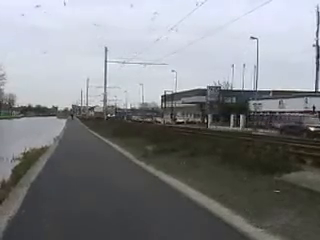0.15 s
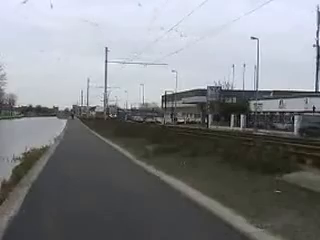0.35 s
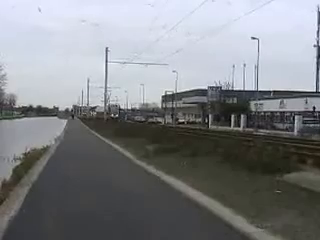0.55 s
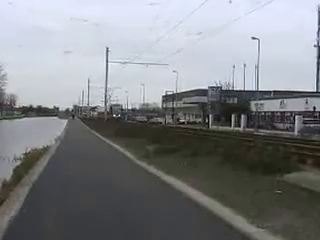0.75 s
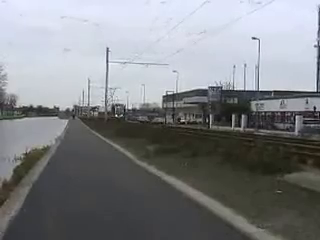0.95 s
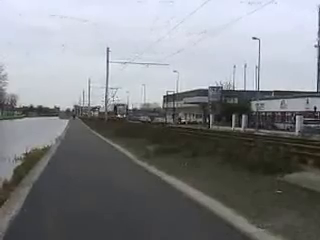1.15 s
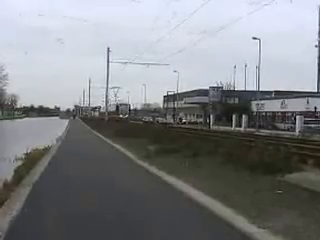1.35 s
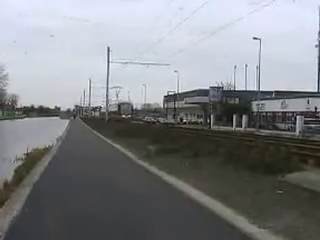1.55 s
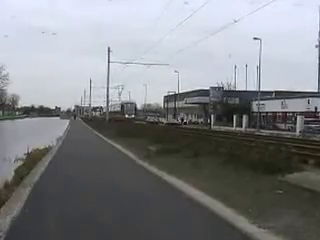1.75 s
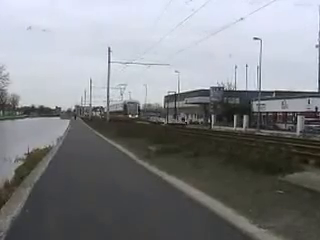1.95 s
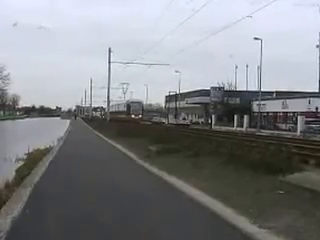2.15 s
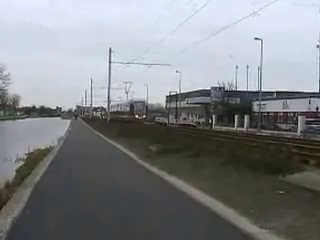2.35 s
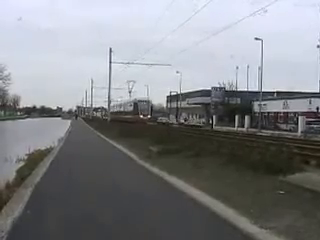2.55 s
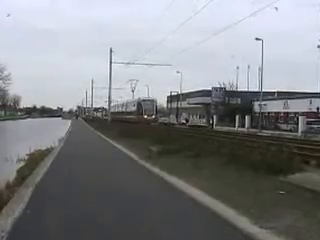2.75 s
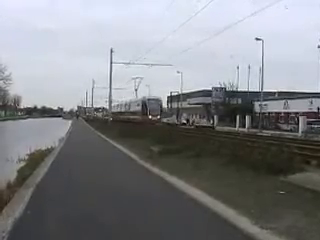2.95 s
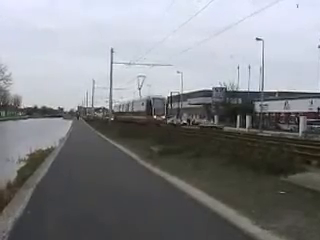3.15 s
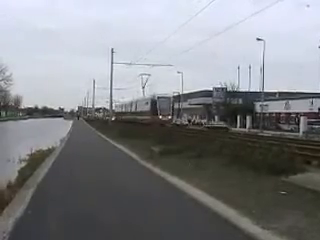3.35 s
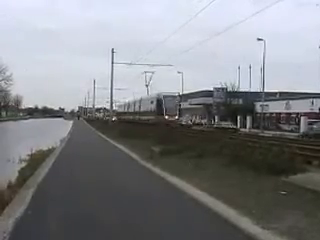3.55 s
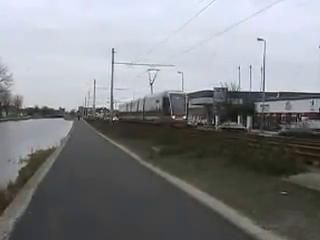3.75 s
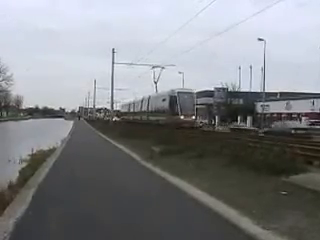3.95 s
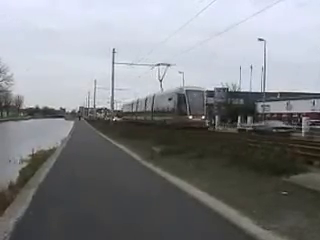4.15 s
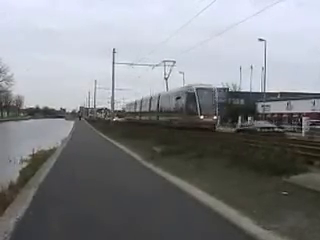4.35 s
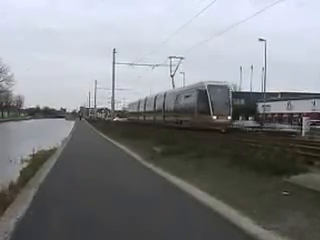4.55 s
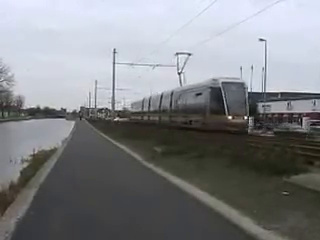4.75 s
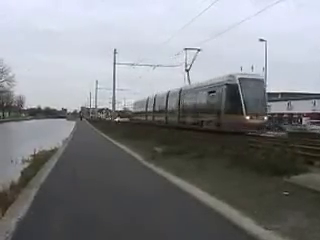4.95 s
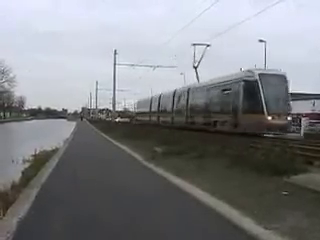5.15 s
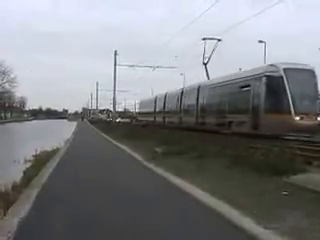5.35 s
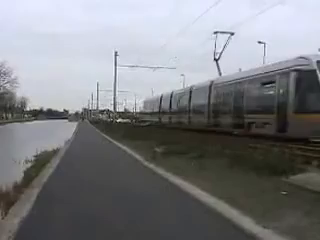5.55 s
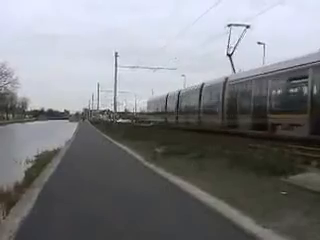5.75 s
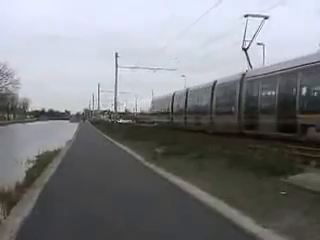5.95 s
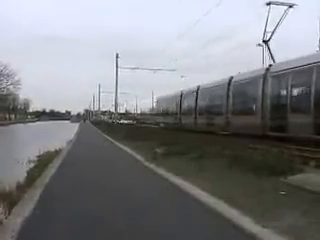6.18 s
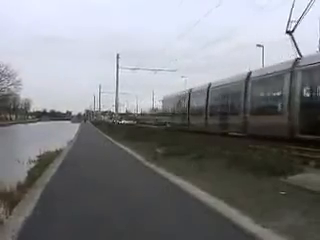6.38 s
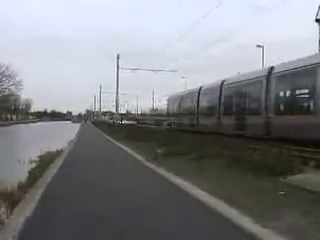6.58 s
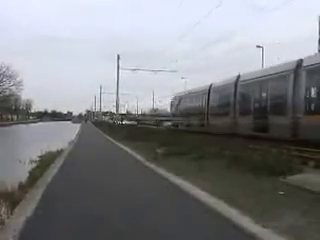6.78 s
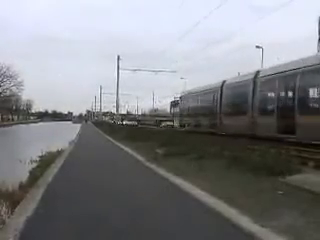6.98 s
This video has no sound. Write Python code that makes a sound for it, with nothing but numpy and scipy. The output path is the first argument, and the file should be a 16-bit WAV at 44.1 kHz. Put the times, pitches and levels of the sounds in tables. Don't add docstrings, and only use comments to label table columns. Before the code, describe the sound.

An open canal path beside a tram track, heard through a small camera microphone with faint hiss and slightly rough, muffled treble. In the first second, low wind gusts buffet it, strongest around 0.6 s, over a distant, dull rolling rumble. A soft joint knock comes at 1.3 s and motor hum swells briefly near 1.6 s. More gusts flutter at 2.3-2.7 s, with a faint knock at 2.9 s. The rumble gains weight, and a low electric hum rises around 4-4.5 s. The nose draws level at about 4.6 s, slightly right; wheel hiss and metallic rail ringing jump forward, with a knock at 4.9 s. The hum sags in pitch, swelling again at 5.5 s. Thuds follow at 5.75 s, a strong double knock at 6.3 s, then higher and duller ones at 6.4 and 6.6 s. The rolling remains full and close until the end at 7 s.

```python
import sys
import numpy as np
from scipy import signal
from scipy.fft import rfft, irfft, dct, next_fast_len
from scipy.io import wavfile
from scipy.ndimage import uniform_filter1d

SR = 44100
rng = np.random.default_rng(int(sys.argv[2]) if len(sys.argv) > 2 else 0)


def wav_record(signal):
    frames = np.transpose(np.atleast_2d(signal))
    bounded = np.clip(frames, -1, 1)
    quanta = np.round(bounded * 32767).astype(np.int16)
    wavfile.write(sys.argv[1], SR, quanta)


def level_to_linear(level):
    exponent = np.asarray(level, float) / 20
    return 10 ** exponent


N = 309582
T = np.arange(N) / SR

ROLL_AT_HZ = [250, 400, 1100, 4500]
# (frequency [Hz], density [dB per Hz])
ROLL_COLOUR = [(18, -43), (30, -27.5), (59, -9.5), (92, -13.0), (128, -7.5), (224, -9.0), (441, -2),
               (869, -18.5), (999, -14.5), (1320, -16), (2550, -25.5), (3450, -30.0), (6790, -36.5),
               (8000, -44.0), (10400, -73), (17600, -120)][:-2] + [(8900, -50.0), (9300, -63.5)]
# (frequency [Hz], width [Hz], level [dB])
RAIL_BOUNCE = [(449.2, 70, 2), (375, 37, -20.5), (497.6, 60, -1.5)]
# (frequency [Hz], width [Hz], level [dB])
WHEEL_RING = [(722.6, 130, 5), (2330, 480, 3), (3477, 400, -7.5), (7540, 1300, -12.5)]
# (multiple of the pitch [1], level [dB])
MOTOR_ORDERS = [(.667, -12.5), (1, 2), (2, -5.5), (4, -13)]
# (time [s], level [dB], half length [s])
HUM = [(.33, -37.5, .1), (1.25, -35, 0.13), (1.57, -27.5, 0.078), (2.15, -36, .3), (3.2, -33.5, .5),
       (3.95, -25, .13), (4.45, -24, .25), (4.85, -31, 0.22), (5.53, -24, 0.14), (6.0, -27, .22),
       (6.7, -41, .3)]
# (time [s], pitch rise [Hz], half length [s])
TRAILING_MOTOR = (6.05, 4, .25)
# (time [s], peak [dB], frequency [Hz])
KNOCKS = [
    (1.297, -8.5, 468),
    (2.864, -12, 426),
    (4.895, -4, 454),
    (5.75, -3.5, 458),
    (6.589, -5, 393),
    (6.294, 0, 443),
    (6.309, 1.5, 415),
    (6.418, -2.5, 520),
]
# (time [s], level [dB])
NEARNESS = [(0.0, -42.5), (0.02, -48), (0.53, -48.5), (1.68, -42), (2.31, -44), (3.21, -42.5), (4.85, -32),
            (4.96, -34), (5.14, -31.5), (5.2, -35), (6.96, -34), (7.02, -31.5)]
# (level [dB], share of nearness [1], closing [dB per s], added once abreast [dB per s])
BODY = (-26, 0.38, 1.046, -3)
TRACK_BED = (-25.5, 0.03, 1.9, -0.77)
RAIL = (-23.5, 0.4626, 0.34, -1.07)
CONTACT = (-36.5, 1.22, 0.1969, -1.2)
BOUNCE = (-18, 0.28, 0.16, -0.9)
RING = (-33.5, 0.4, -0.21, 1.5)
SPREAD_MID = (-45, 0.29, 1.73, -1.2)
SPREAD_HIGH = (-50, 1.5, -0.1, -3)
# (time [s], half length [s],
# body [dB], track bed [dB], rail bounce [dB])
SURGES = [(1.302, .4, -2, -.5, .1), (2.856, .25, 0, 1.5, .1), (3.565, 0.031, -4.5, -4.5, .1),
          (4.258, 0.34, 2, 1.5, .1), (5.1, .15, -0.5, -2, 1), (5.75, 0.2, 0.4, -3.5, 4),
          (6.201, .1, 0, 2.5, -2), (6.32, .04, -1.5, -6.5, -7), (6.406, .012, -3.5, -6, -5.5),
          (6.597, .15, -0.2, 1, 0.3), (6.897, .12, 0, -3, 2), (7.03, .025, -8, -12, -12)]
# (frequency [Hz], density [dB per Hz])
SPREAD_COLOUR = [(120, -39), (200, -7.5), (450, 4), (624, -4.5), (1390, -8), (1640, -15), (2780, -16.5),
                 (3540, -22.5), (6000, -28), (7800, -68.5), (13200, -120)]
SPREAD_TOP = [(3240, -39.0), (5500, -20.0), (6150, -16.0), (6790, -8.5), (7370, -13), (8040, -3.0),
              (8580, -6.0), (11200, -41.5), (18900, -120)][:-2] + [(9150, -12)]
# (time [s], depth [dB], half length [s])
AXIS_MID = (5.22, -7.5, .46)
AXIS_HIGH = (5.72, -22, .5)
# (time of peak [s], level [dB], rise [s])
GUSTS = [(.05, -25.5, .08), (.18, -31, 0.098), (.46, -22, .08), (.6, -16, 0.11), (1.28, -34, 0.072),
         (1.82, -31, 0.1), (2.34, -24, 0.12), (2.55, -22.5, 0.14), (2.68, -22.5, 0.077), (3.02, -28, 0.11),
         (4.58, -26.5, .12), (4.7, -32, .07), (5.2, -29, 0.11), (5.6, -33, 0.1), (6.02, -36, 0.092)]
# (frequency [Hz], density [dB per Hz])
WIND_COLOUR = [(20, -14), (50, 6), (100, -5.5), (170, -3.5), (300, -33.5), (800, -53.5)]
# (time [s], level [dB], half length [s])
FUZZ = [
    (4.35, -79, .04),
    (4.49, -66, .04),
    (4.66, -77, .05),
    (4.82, -75, .06),
    (5.7, -63, .62),
    (6.55, -74, .1),
    (6.85, -79, .05),
]
# (frequency [Hz], level [dB])
STEP = [(40, -5), (200, -3), (440, 2), (1000, -6), (2000, -10), (3500, -16.5), (5500, -19.5), (7500, -24.5),
        (8500, -22), (10400, -25)]

MID_NEAR_DB, ABREAST_S = -40, 4.6
MOTOR_HZ, SAG_HZ, SAG_MID_S, SAG_S = 71.23, 5.5, 5.1, 1.3
GUST_FALL_SHARE, BREEZE_DB = .6, -45
EDDY_GAP_S, EDDY_DB, EDDY_HZ, EDDY_OCTAVES = 0.03, 7, 105.4, 0.23
MIC_HISS_DB, OFFSET = -64.5, .0067
FRAME, FRAME_START, CUTOFF_HZ = 2822, 1367, 10400


def rolling(flicker_db):
    body_db = level(BODY) + surge(column=2)
    bed_db = level(TRACK_BED) + surge(column=3)
    out = 0
    for k, level_db in enumerate([body_db, bed_db, level(RAIL), level(CONTACT)]):
        share = list(zip(ROLL_AT_HZ, np.arange(len(ROLL_AT_HZ)) == k))
        part = coloured(lambda hz: closed(ROLL_COLOUR)(hz) * np.sqrt(at_hz(share, hz)))
        out = out + level_to_linear(level_db + flicker_db * drift(11)) * part
    return out


def ringing(modes, level_db, from_s, rise_s):
    out = 0
    for hz, width_hz, db in modes:
        rough = rng.standard_normal(N)
        tone = resonate(resonate(rough, hz, width_hz), hz, width_hz)
        out = out + level_to_linear(db) * rms_one(tone)
    arrival = np.clip((T - from_s) / rise_s, 0, 1)
    return level_to_linear(level_db) * arrival * out


def motor():
    sag_hz = SAG_HZ * (1 + np.tanh((T - SAG_MID_S) / SAG_S)) / 2
    hz = MOTOR_HZ - sag_hz + bell(*TRAILING_MOTOR)
    phase = 2 * np.pi * np.cumsum(hz + .4 * drift(2.8)) / SR
    hum = 0
    for order, db in MOTOR_ORDERS:
        waver_db = 2.7 * (order != 1) * drift(1)
        hum = hum + level_to_linear(db + waver_db) * np.sin(order * phase + .3 * order * drift(3.3))
    return np.sqrt(2) * level_to_linear(swells(HUM)) * hum


def knocks(rise_s, fall_s):
    out = np.zeros(N)
    t = np.arange(int(.05 * SR)) / SR
    shape = (1 - np.exp(-t / rise_s)) ** 2 * np.exp(-t / fall_s)
    for s, db, hz in KNOCKS:
        at = round(s * SR)
        out[at:at + len(t)] += level_to_linear(db - 2.5) * shape / shape.max() * np.sin(2 * np.pi * hz * t)
    return out


def spread(tram, lag_db, lean_db):
    middle_db = level(SPREAD_MID) + bell(*AXIS_MID)
    top_db = level(SPREAD_HIGH) + bell(*AXIS_HIGH)
    even = tram / np.sqrt(uniform_filter1d(tram ** 2, size=SR // 2))
    lag = rms_one(np.gradient(uniform_filter1d(even, size=5)))
    same = level_to_linear(lag_db) * lag + level_to_linear(lean_db) * even
    middle = level_to_linear(middle_db + 6.5) * (coloured(closed(SPREAD_COLOUR)) + same)
    return middle + level_to_linear(top_db) * coloured(closed(SPREAD_TOP))


def wind(lump_db, shared_db):
    gust_db = swells(GUSTS, GUST_FALL_SHARE)
    blow = np.hypot(level_to_linear(gust_db - 11.5), level_to_linear(BREEZE_DB + 5.0 * drift(2.1)))
    apart, shared = [blow * coloured(closed(WIND_COLOUR)) * rms_one(level_to_linear(lump_db * drift(20))) for _ in range(2)]
    t = np.arange(-.02, .02, 1 / SR)
    chance = rng.standard_normal((400, 4))
    times = .02 + np.cumsum(EDDY_GAP_S * np.exp(.25 * chance[:, 0]))
    for s, (_, size, pitch, turn) in zip(times[times < N / SR - .03], chance):
        at = round((s - .02) * SR)
        hz = EDDY_HZ * 2 ** (EDDY_OCTAVES * pitch)
        peak = level_to_linear(gust_db[round(s * SR)] + EDDY_DB + 1.5 * size)
        puff = np.cos(2 * np.pi * hz * t + 5 * turn) * np.exp(-(1.3 * hz * t) ** 2)
        apart[at:at + len(t)] += peak * puff
    return apart * [[1], [-1]] + level_to_linear(shared_db) * shared


def microphone_hiss():
    return level_to_linear(MIC_HISS_DB) * coloured(closed([(7000, 0), (11000, 0)]))


def converter_noise():
    treble_db = level(CONTACT)
    activity_db = np.maximum(swells(FUZZ), -83)
    low = 0
    for hz in (8700, 9530, 10360, 11190):
        on = 1. * (activity_db + 5 * drift(9) > -77.5)
        strip = closed([(hz, 0), (hz + 830, 0)])
        low = low + np.array([coloured(strip) for side in "LR"]) * uniform_filter1d(on, size=400)
    high = np.array([coloured(closed([(14500, -1), (15750, -1)])) for side in "LR"])
    return level_to_linear(.7 * treble_db - 52) * (level_to_linear(-2) * low + high)


def level(part):
    db, share, closing, abreast = part
    near_db = in_time(NEARNESS)[0] - MID_NEAR_DB
    return db + share * near_db + closing * T + abreast * np.maximum(T - ABREAST_S, 0)


def surge(column):
    return sum(bell(row[0], row[column], row[1]) for row in SURGES)


def bell(s, height, span):
    return height * np.exp(-((T - s) / span) ** 2)


def swells(rows, fall_share=1):
    power = 0
    for s, db, span in rows:
        half = span * np.where(T > s, fall_share, 1)
        power = power + level_to_linear(2 * db) * np.exp(-2 * ((T - s) / half) ** 2)
    return 10 * np.log10(power + 1e-12)


def in_time(rows):
    s, *columns = np.transpose(rows)
    return [np.interp(T, s, c) for c in columns]


def drift(rate):
    r = np.exp(-80 * np.pi * rate / SR)
    slow = signal.lfilter([1], [1, -2 * r, r * r], rng.standard_normal(N // 40 + 2002))[2000:]
    return np.interp(np.arange(N) / 40, np.arange(len(slow)), rms_one(slow))


def coloured(gain_at):
    size = next_fast_len(N)
    hz = np.fft.rfftfreq(size, 1 / SR)
    return rms_one(irfft(rfft(rng.standard_normal(size)) * gain_at(hz), size)[:N])


def closed(points):
    return lambda hz: level_to_linear(at_hz(points, hz)) * (hz > points[0][0]) * (hz < points[-1][0])


def at_hz(points, hz):
    point_hz, value = np.array(points).T
    return np.interp(np.log(hz + 1), np.log(point_hz), value)


def resonate(x, hz, width_hz):
    r = np.exp(-np.pi * width_hz / SR)
    poles = [1, -2 * r * np.cos(2 * np.pi * hz / SR), r * r]
    return signal.lfilter([(1 - r * r) / 2, 0, (r * r - 1) / 2], poles, x)


def rms_one(x):
    return x / np.sqrt(np.mean(x ** 2) + 1e-20)


def scene():
    bounce_db = level(BOUNCE) + surge(column=4)
    ring_db = level(RING) + 2.5 * drift(4)
    tram = rolling(flicker_db=0.57) + motor() + knocks(rise_s=0.002, fall_s=.005)
    tram = tram + ringing(RAIL_BOUNCE, bounce_db - 4.5, from_s=3.8, rise_s=1.5)
    tram = tram + ringing(WHEEL_RING, ring_db - 3.5, from_s=4.5, rise_s=1.5)
    ports = tram + spread(tram, lag_db=-8.0, lean_db=-3.5) * [[-1], [1]]
    return ports + wind(lump_db=3, shared_db=-3.5) + microphone_hiss()


def camera_rounding(x, side_db):
    m, half = FRAME, FRAME // 2
    pad = np.pad([x[0] + x[1], x[0] - x[1]], ((0, 0), (2 * m - FRAME_START, 3 * m))) / 2
    count = pad.shape[1] // m - 1
    window = np.sin(np.pi * (np.arange(2 * m) + .5) / (2 * m))
    index = np.arange(count)[:, None] * m + np.arange(2 * m)
    a, b, c, d = np.split(pad[:, index] * window, 4, axis=2)
    folded = np.concatenate([-c[..., ::-1] - d, a - b[..., ::-1]], axis=2)
    bins = dct(folded, type=4, norm="ortho")
    hz = (np.arange(m) + .5) * SR / 2 / m
    loud = .15 * (np.mean(bins[0] ** 2, axis=1, keepdims=True) / .008 + 1e-9) ** .65
    band = (22 * np.log(1 + hz / 700)).astype(int)
    patch = rng.standard_normal((2, count, band[-1] + 1))[..., band]
    finer_db = np.array([0, side_db])[:, None, None] * (hz > 7400)
    step = loud * level_to_linear(at_hz(STEP, hz) + 2.5 * patch + finer_db)
    kept = step * np.sign(bins) * np.floor(abs(bins) / step + .42)
    back = dct(kept * (hz < CUTOFF_HZ), type=4, norm="ortho")
    u, v = back[..., :half], back[..., half:]
    frames = np.concatenate([v, -v[..., ::-1], -u[..., ::-1], -u], axis=2) * window
    joined = (frames[:, :-1, m:] + frames[:, 1:, :m]).reshape(2, -1)
    mid, side = joined[:, m - FRAME_START:][:, :N]
    return np.array([mid + side, mid - side])


def top_cut(x):
    return signal.sosfilt(signal.butter(12, 15800, fs=SR, output="sos"), x)


def record(dry):
    soft = 1.05 * np.tanh(dry / 1.05)
    mix = camera_rounding(soft, side_db=-4) + converter_noise() + OFFSET
    return top_cut(mix)


dry = scene()
out = record(dry)
wav_record(out)
```